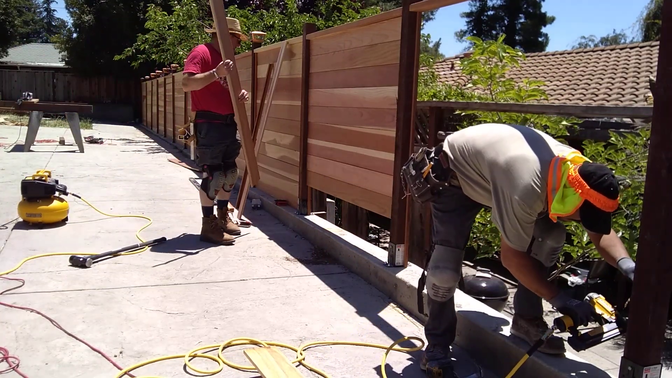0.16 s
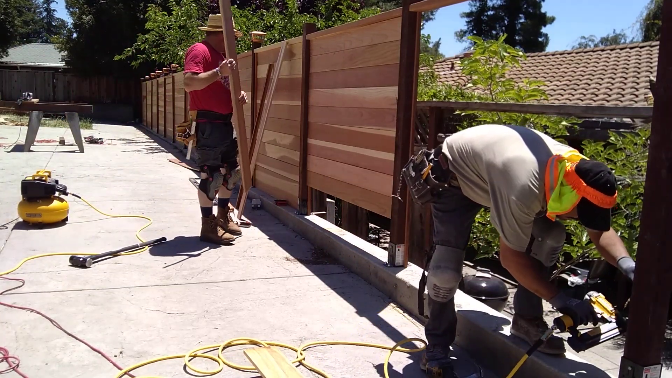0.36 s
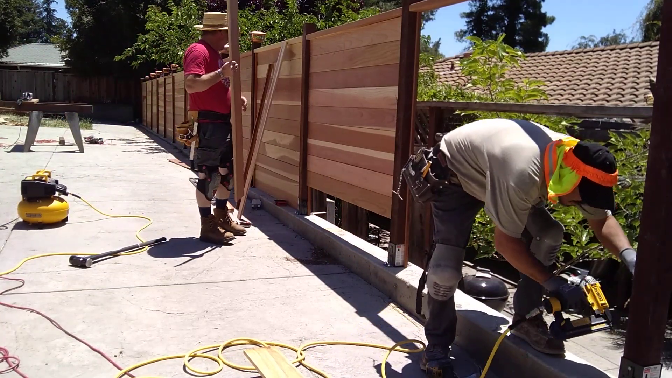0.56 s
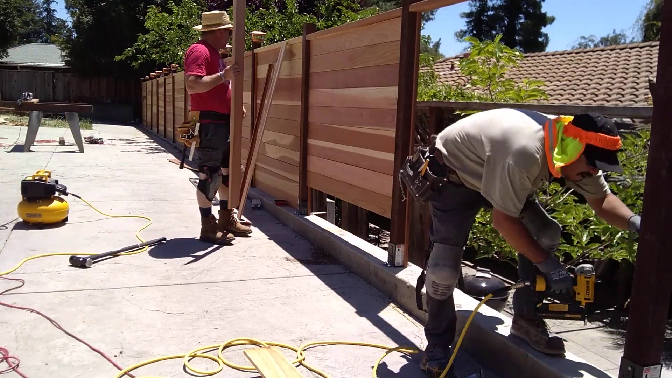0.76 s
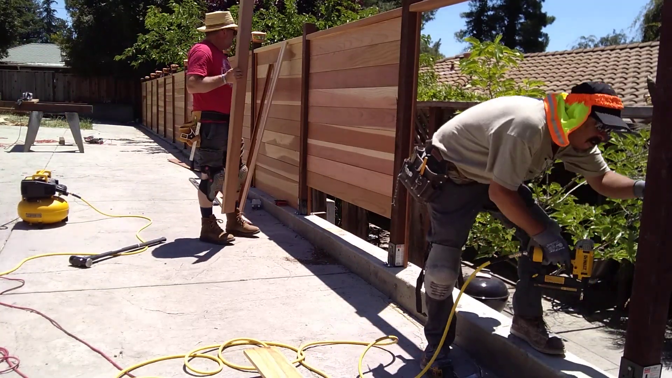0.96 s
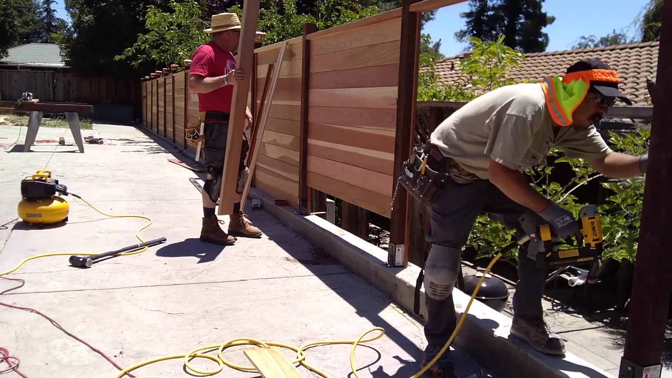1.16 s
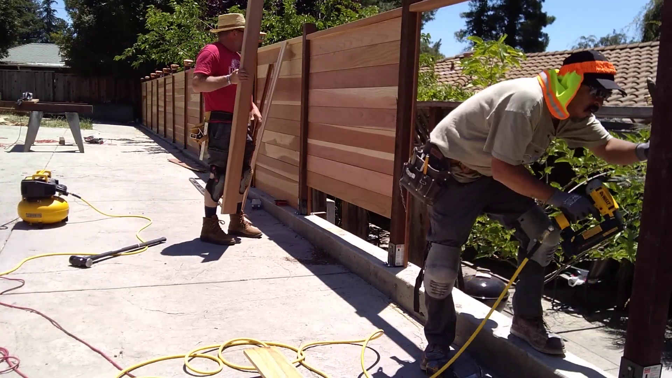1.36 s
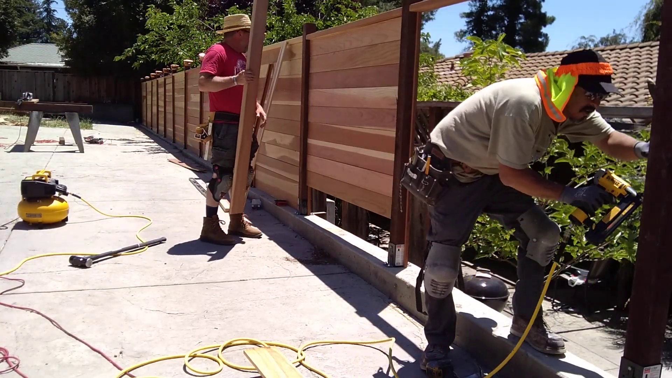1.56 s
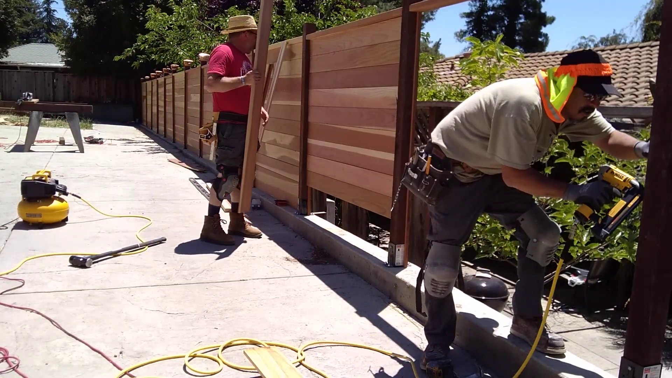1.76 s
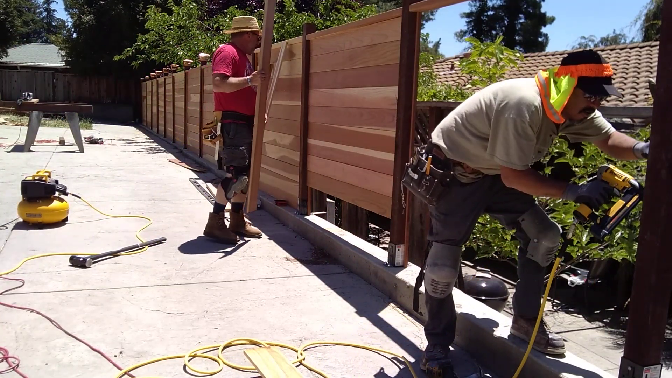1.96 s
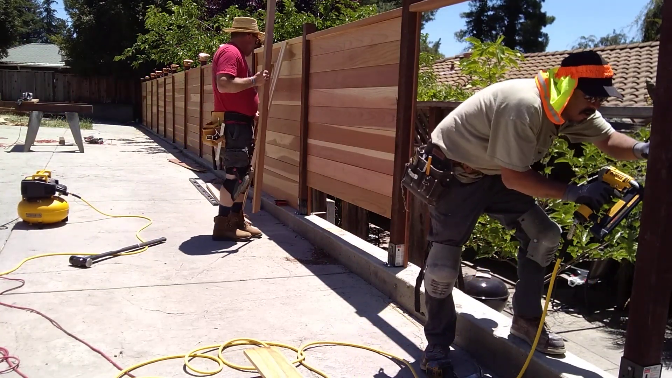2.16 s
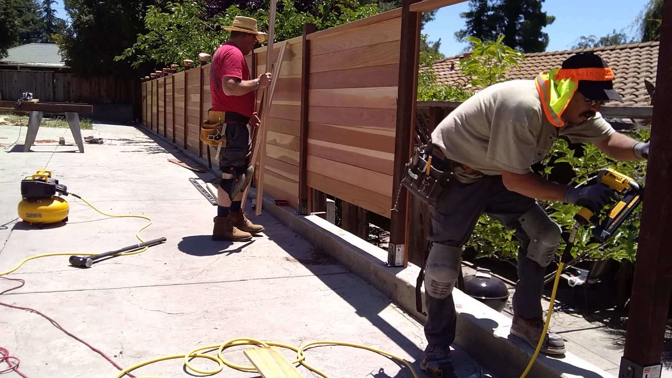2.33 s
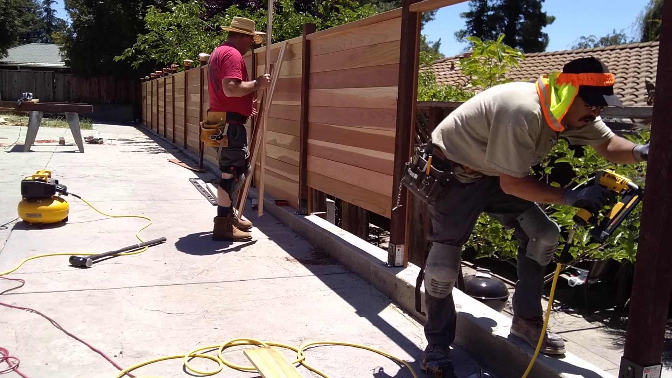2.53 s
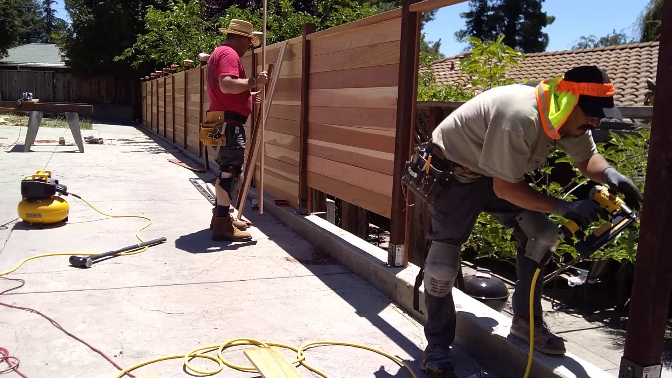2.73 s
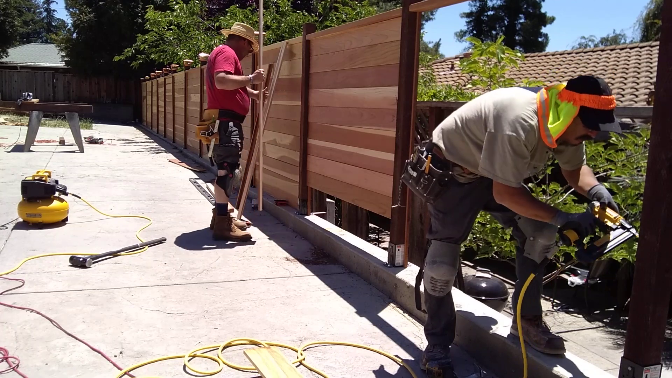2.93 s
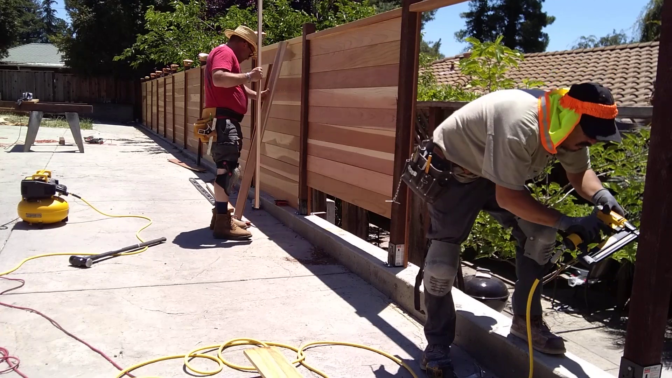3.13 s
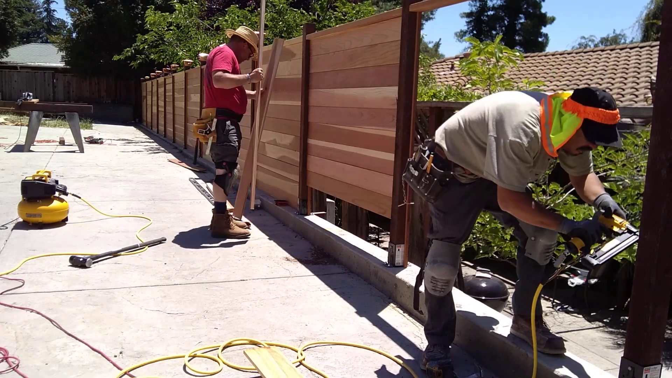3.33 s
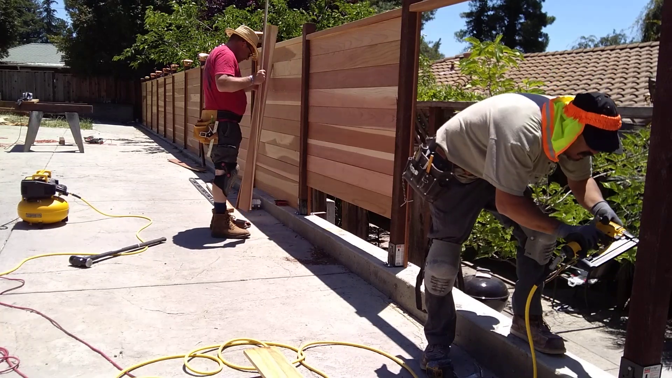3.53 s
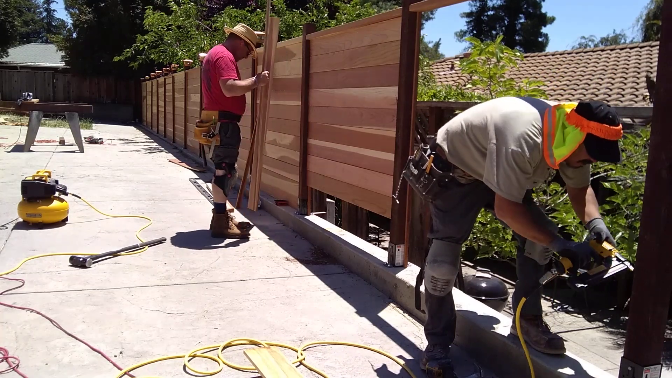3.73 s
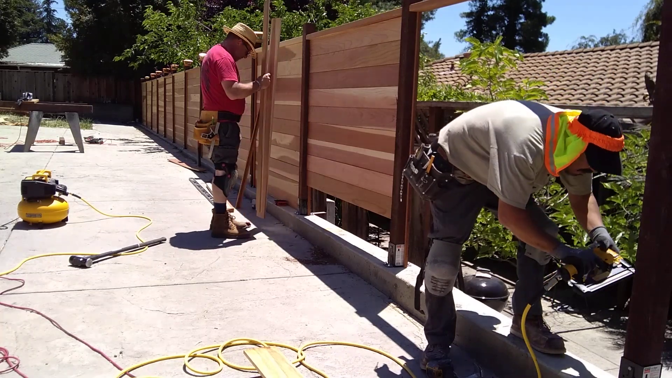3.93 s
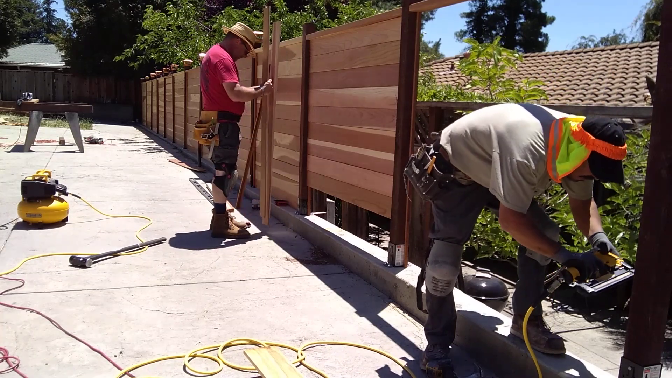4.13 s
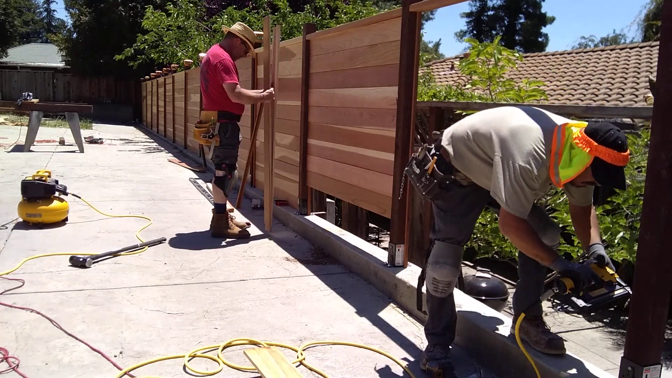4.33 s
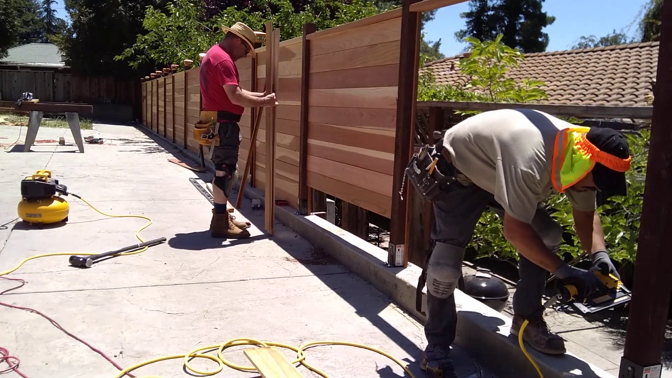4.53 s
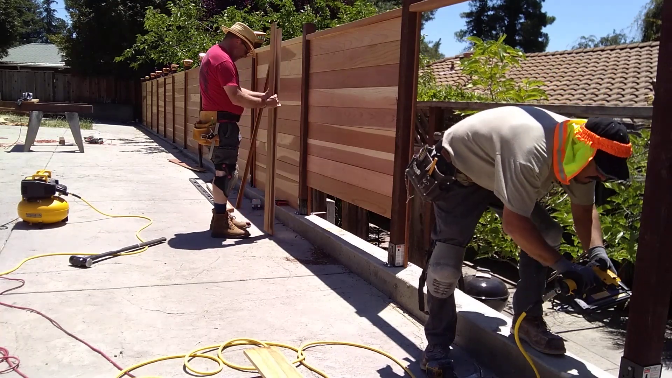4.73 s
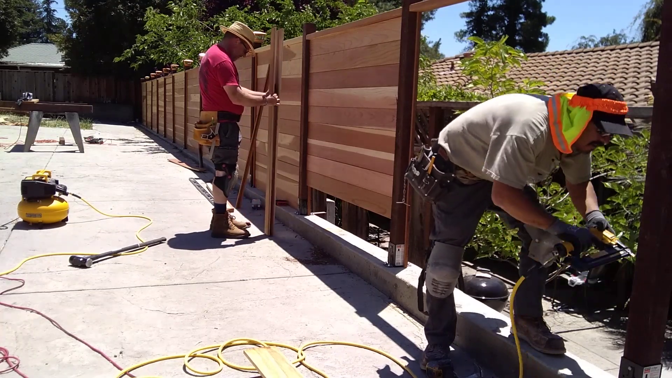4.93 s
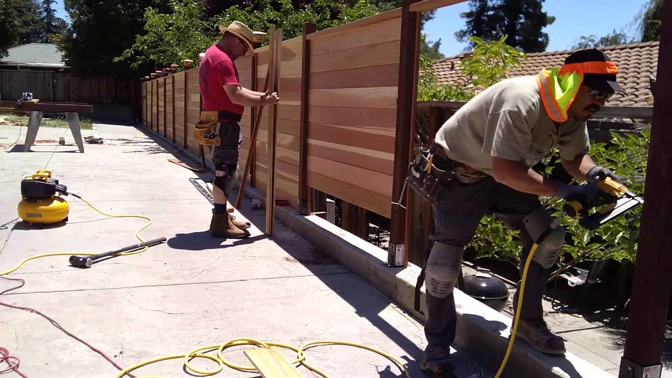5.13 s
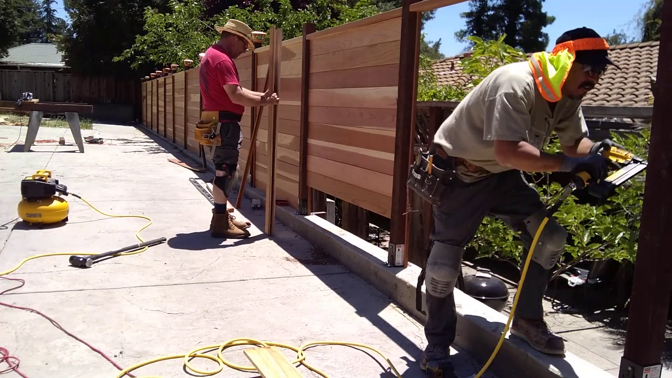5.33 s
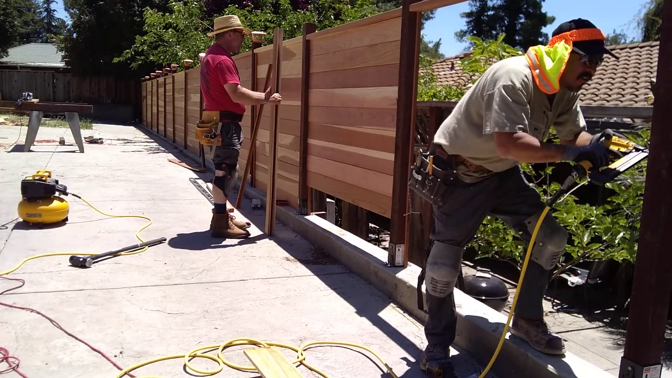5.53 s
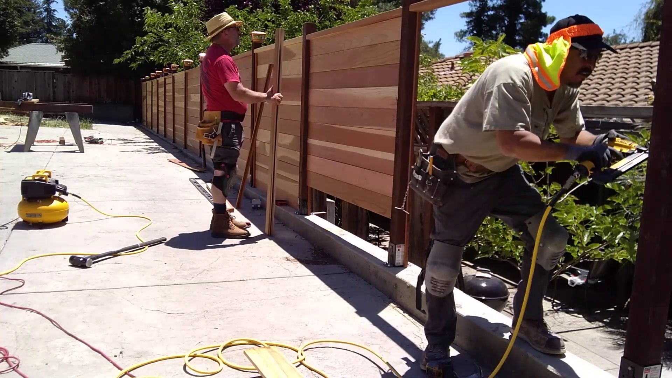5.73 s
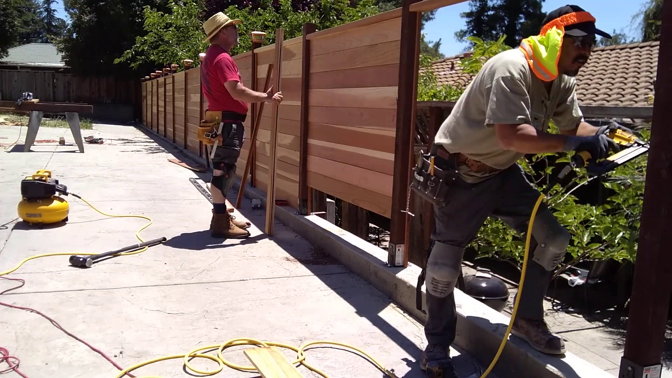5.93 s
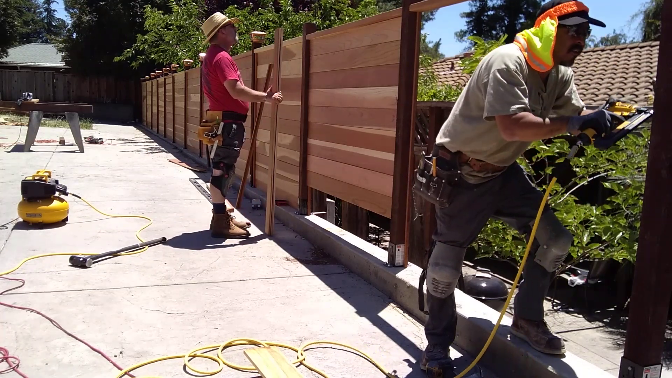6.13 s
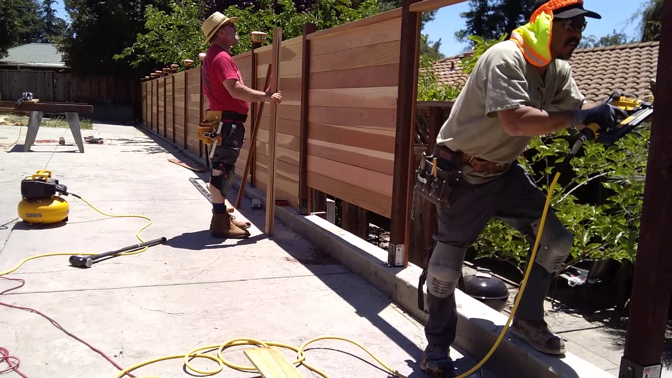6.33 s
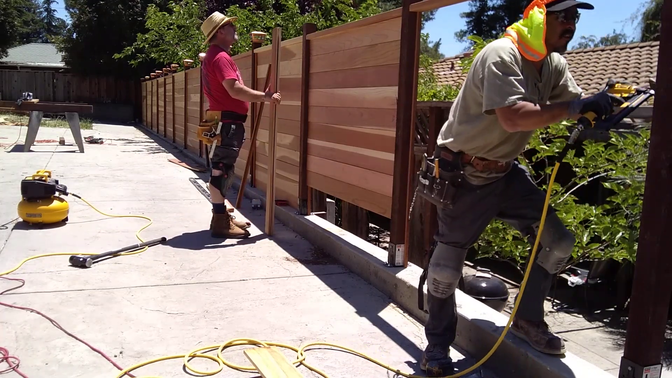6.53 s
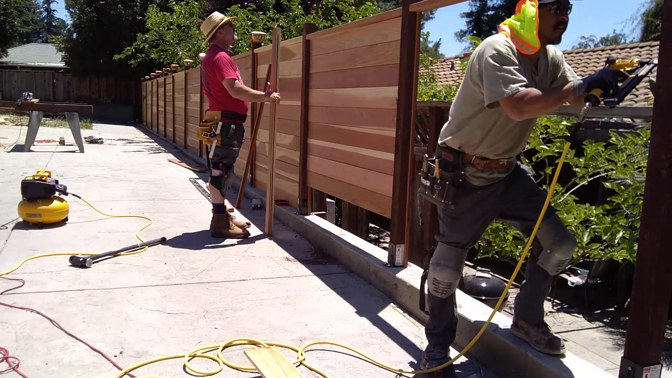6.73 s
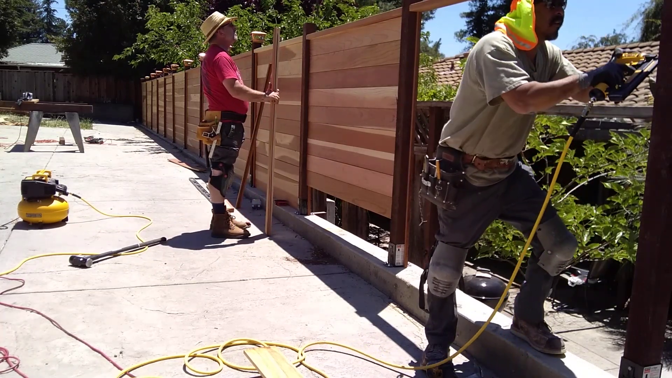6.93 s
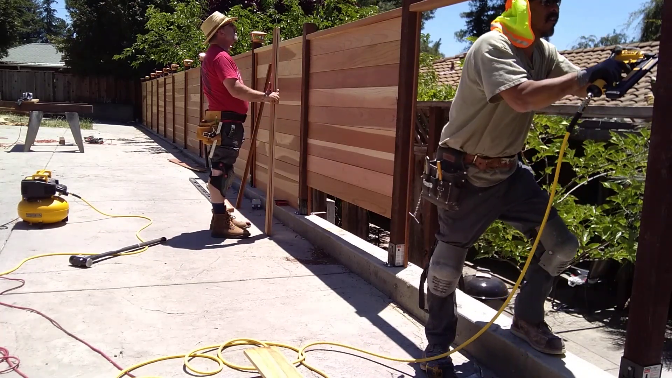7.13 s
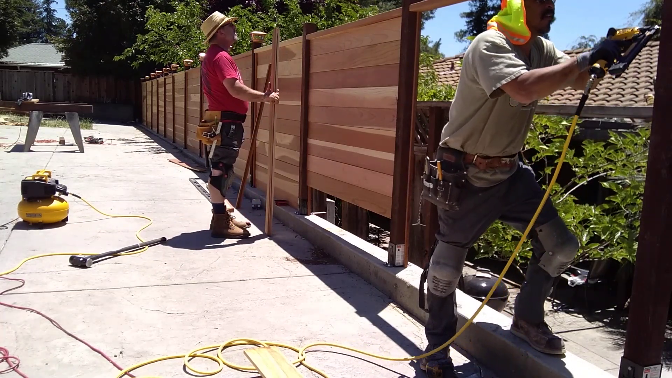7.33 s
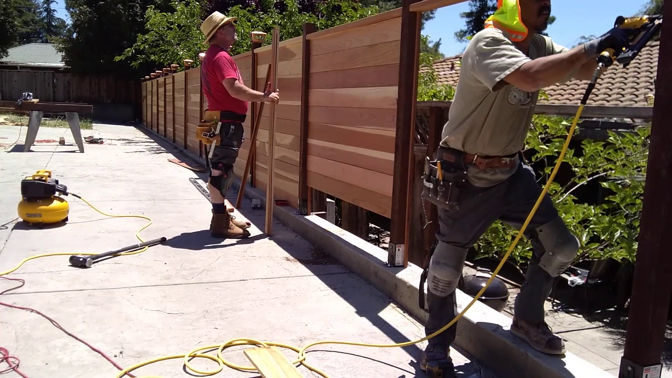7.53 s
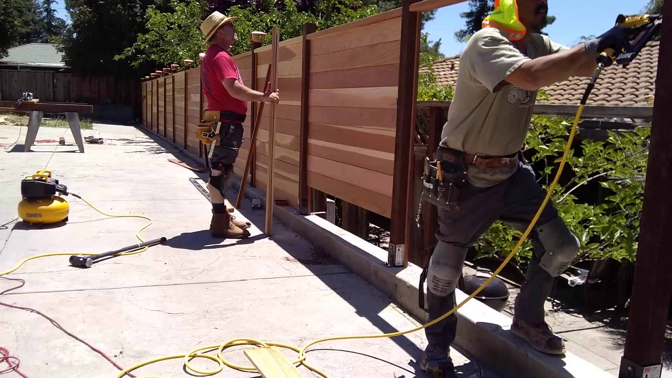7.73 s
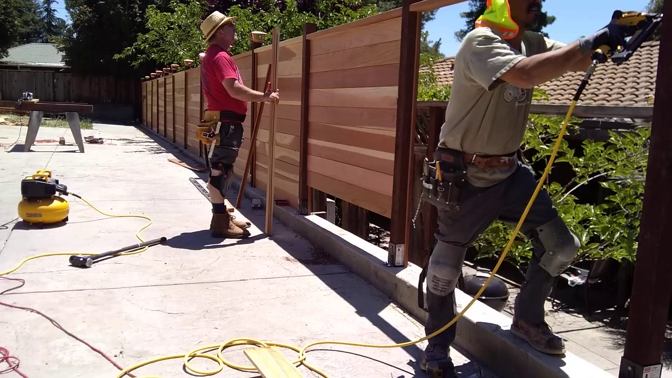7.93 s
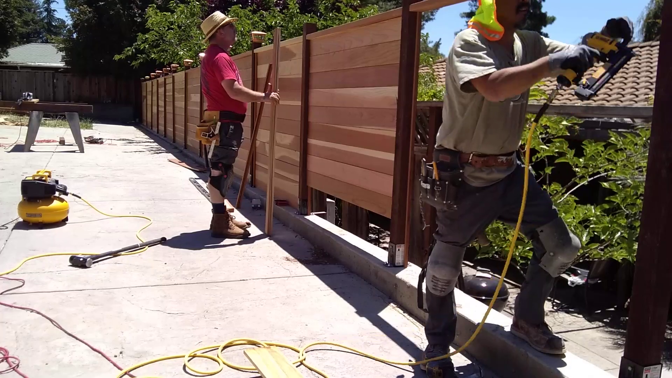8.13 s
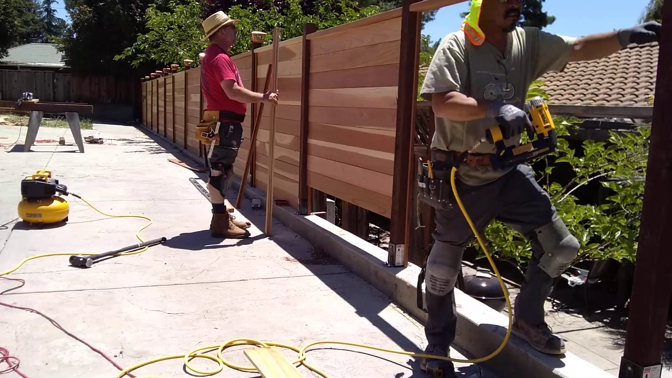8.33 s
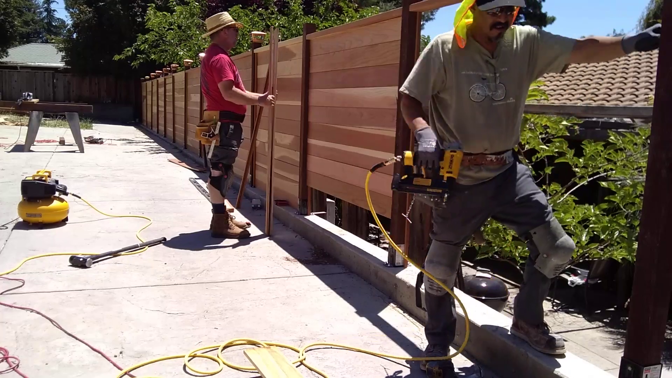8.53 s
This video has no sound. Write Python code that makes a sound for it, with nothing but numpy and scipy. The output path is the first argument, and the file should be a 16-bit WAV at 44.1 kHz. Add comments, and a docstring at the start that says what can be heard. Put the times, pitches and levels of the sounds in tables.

```python
"""Outdoors beside a fence in a breeze: an air nailer drives nine nails close to a camera.
Each shot: the valve hisses open, the piston slams the nail home and rebounds; on release a jet of air
vents and the piston knocks back up. All this is shaped noise, pressure pulses and ringing modes.
Lumpy low noise buffets the left port, sliding sines call as small birds, and a faint tone falls.
The camera widens its stereo and rides its gain, so the yard swells up between shots."""
import sys
import numpy as np
from scipy import signal
from scipy.fft import rfft, irfft, next_fast_len
from scipy.io import wavfile
from scipy.ndimage import uniform_filter1d

SR = 44100
rng = np.random.default_rng(int(sys.argv[2]) if len(sys.argv) > 2 else 0)


def waveform_to_disk(signal):
    """Save audio, clipped to [-1, 1], as 16-bit WAV at the path in sys.argv[1]."""
    frames = np.transpose(np.atleast_2d(signal))
    scaled = np.clip(frames, -1, 1) * 32767
    samples = np.round(scaled).astype(np.int16)
    wavfile.write(sys.argv[1], SR, samples)


N = 378819

# All levels stand ahead of the camera's gain control; spectra are relative, as noise() evens them.
# Nails driven: (time [s], piston travel since the valve opened [ms], blow level [dB],
# second blow re first [dB], crack level [dB])
BLOWS = [(0.323, 18.8, -8.5, -3.5, -9.5), (2.4124, 19, -5, -19.5, -10), (3.428, 20.2, -8, -7.5, -11),
         (4.1147, 19.7, -9.5, -7.5, -12.5), (4.6593, 17.4, -8.5, -7, -9.5), (5.837, 19.6, -6.5, -6, -12),
         (6.3882, 19.1, -10.5, 0.1, -11.5), (7.056, 19.6, -9.5, -1, -11), (7.797, 16.9, -8, -0.2, -10)]
# Colour of air through the valve, also lent to ticks and clanks: (frequency [Hz], density [dB per Hz])
VALVE_AIR = [(200, -1), (400, -1), (800, -18.5), (1500, -9.5), (3000, -11), (5000, -11), (7500, -7),
             (10000, -0.8), (11500, 6), (13000, -10), (14000, -8.5)]


def amp(db):
    """Decibels to amplitude."""
    return 10 ** (np.asarray(db) / 20)


def evened(x):
    """Scales a signal to an RMS of one."""
    return x / np.sqrt(np.mean(x ** 2) + 1e-20)


def read(points, hz):
    """Reads a spectrum table, straight between its points on a log frequency axis."""
    f, value = np.transpose(points)
    return np.interp(np.log(hz + 1), np.log(f + 1), value)


def curve(rows):
    """Draws a table of times and values as a line through the whole scene."""
    return np.interp(np.arange(N) / SR, *np.transpose(rows))


def add(mix, s, sound):
    """Mixes a sound in at s seconds, cut off at the scene's end."""
    part = mix[..., round(s * SR):][..., :sound.shape[-1]]
    part += sound[..., :part.shape[-1]]


def noise(spectrum, alike=None, patchy_db=3.5):
    """Two-port noise of a given colour in drifting patches; the ports share part of it."""
    # Likeness of the ports for the near sounds: (frequency [Hz], correlation [0-1])
    near_alike = [(300, 0.88), (1500, 0.86), (3000, 0.72), (6000, 0.23), (12000, 0.2)]
    # Right port against the left: (frequency [Hz], level [dB])
    right_tilt = [(500, 3), (3000, 4.5), (8000, -1), (12000, -6), (14000, -1)]
    frames, hz = N // 128 + 5, np.fft.rfftfreq(512, 1 / SR)
    a, b, c, d, patches = rng.standard_normal((frames, 257, 5)).T
    patches = uniform_filter1d(patches, size=6, axis=0)
    patches = evened(uniform_filter1d(patches, size=8, axis=1))
    same = np.clip(read(near_alike if alike is None else alike, hz), -1, 1)[:, None]
    left = a + 1j * b
    right = same * left + np.sqrt(1 - same ** 2) * (c + 1j * d)
    right = right * amp(read(right_tilt, hz))[:, None]
    z = np.array([left, right]) * amp(read(spectrum, hz)[:, None] + patchy_db * patches)
    return evened(signal.istft(z, nperseg=512, noverlap=384)[1][:, :N])


def swell(rise, t60):
    """Half a second of envelope: rises softly, then dies away by 60 dB per t60 (both in s)."""
    t = np.arange(SR // 2) / SR
    return (1 - np.exp(-(t / rise) ** 2)) * amp(-60 * t / t60)


def splutter(depth_db, size):
    """Quick random level changes of a turbulent jet, smoothed over size samples twice."""
    drift = uniform_filter1d(rng.standard_normal(N), size=size)
    return amp(depth_db * evened(uniform_filter1d(drift, size=size)))


def ring(modes, damp):
    """One blow on a body; every blow lands elsewhere and weights and shifts the modes anew."""
    t = np.arange(SR // 8)[:, None] / SR
    hz, db, t60 = np.transpose(modes)
    shift, weight = rng.standard_normal((2, len(hz)))
    decay = amp(db + 6.9 * weight - 60 * t / (damp * t60))
    out = (decay * np.sin(2 * np.pi * hz * (1 + .04 * shift) * t)).sum(1)
    return -out / abs(out).max()


def site():
    """Outdoor air: a steady low murmur and rustle with a thin hiss under them."""
    # Colour of the outdoor air: (frequency [Hz], density [dB per Hz])
    air = [(150, 0), (300, -12), (500, -6.5), (900, -18), (1300, -26), (2200, -26), (3300, -28),
           (5000, -30.5), (8000, -35.5), (11000, -30), (13500, -39.5)]
    # Likeness of the ports for sound from all sides: (frequency [Hz], correlation [0-1])
    diffuse = [(300, 0.56), (1500, 0.2), (4000, 0.05), (12000, .05)]
    hiss = noise([(500, -2.0), (3000, -3.0), (5000, -5.5), (8000, -17), (14000, -21.0)], diffuse)
    return amp(-61) * noise(air, diffuse, patchy_db=2.0) + amp(-72.5) * hiss


def wind():
    """Lumpy buffeting, mostly at the left port with a steeper-growing roar, plus eddies of about a cycle."""
    # Wind at the left port: (time [s], level [dB])
    buffet = [(0, -36.5), (.3, -32), (.4, -36), (.7, -43.5), (1.0, -60), (1.1, -44), (1.45, -44.5),
              (2.35, -46.5), (2.5, -55.5), (3.0, -52.5), (3.35, -44.5), (3.7, -65.5), (3.95, -65.5),
              (4.15, -48), (4.7, -39), (5.1, -66.5), (5.4, -38.5), (5.8, -45), (6.2, -53.5), (6.5, -47.5),
              (6.8, -53), (7.1, -44.5), (7.4, -55), (7.8, -36), (8.59, -46)]
    # Colour of the buffeting: (frequency [Hz], density [dB per Hz])
    gust = [(20, -14.5), (40, -1.5), (80, 5.5), (130, 2.75), (200, -8), (280, -12.5), (400, -21.5),
            (600, -35.5), (1000, -47)]
    # Colour of the roar of strong wind: (frequency [Hz], density [dB per Hz])
    flutter = [(60, -30.5), (110, -8.5), (170, 2), (260, -6), (400, -13.5), (700, -27.5), (3000, -70.5)]
    # Strongest single eddies that thump the left port: (time [s], envelope peak [dB], pitch [Hz])
    eddies = [(0.137, -27, 104), (0.252, -19, 180), (.281, -22, 133), (0.634, -25.5, 173.6),
              (1.451, -24.5, 74.4), (1.93, -29.5, 94), (2.361, -29, 89.8), (3.133, -27.5, 130),
              (3.328, -31.5, 107), (4.426, -23, 122), (4.462, -17.5, 169), (5.404, -23.5, 116.6),
              (5.791, -27.5, 113), (6.605, -25.5, 122), (6.879, -27, 115.7), (7.95, -19, 172),
              (8.101, -23, 150), (8.215, -29.5, 328), (8.314, -29.5, 141), (8.469, -28, 110),
              (8.561, -24.5, 121)]
    hz = np.fft.rfftfreq(N, 1 / SR)
    lumps = rfft(rng.standard_normal((2, N))) / (1 + (hz / 24) ** 4)  # slow, below about 24 Hz
    lumps = evened(irfft(lumps, N))
    colour = amp(read([(5.5, -39)] + gust + [(3000, -72.5)], hz))
    lumpy = rng.standard_normal((2, N)) * amp(3.5 * lumps)
    left, right = (evened(irfft(rfft(port) * colour, N)) for port in lumpy)
    wind_db = curve(buffet)
    out = amp(wind_db) * np.array([left, amp(-14) * right])

    roar = rng.standard_normal(N) * amp(2.37 * lumps[0])
    roar = evened(irfft(rfft(roar) * amp(read(flutter, hz)), N))
    out[0] += amp(-47 + 1.5 * (wind_db + 39)) * roar  # gains 1.5 dB per dB of wind

    t = np.arange(-1300, 1300) / SR
    for (s, db, pitch_hz), phase in zip(eddies, rng.random(len(eddies))):
        turns = pitch_hz * t
        eddy = np.exp(-(turns / 0.45) ** 2) * np.sin(2 * np.pi * (turns + phase))
        add(out[0], s + t[0], amp(db) * eddy)
    return out


def birds():
    """Thin, husky notes: sines that slide down onto a held pitch and waver, stronger on the left."""
    # Bird notes: (time [s], level before panning [dB], first pitch [Hz], length [s])
    notes = [(0.647, -69, 5700, 0.035), (1.012, -71, 6900, 0.043), (1.775, -68.5, 6400, 0.036),
             (2.098, -67, 6200, 0.061), (2.148, -68.5, 6300, 0.076), (2.225, -81, 5780, 0.038),
             (3.337, -71.5, 5600, 0.027)]
    held_hz, slide_s, waver_hz = 5430, .011, 60
    out = np.zeros(N)
    for s, db, first_hz, length in notes:
        t = np.arange(0, length, 1 / SR)
        waver = evened(uniform_filter1d(rng.standard_normal(4500), size=90))[:len(t)]
        hz = held_hz + (first_hz - held_hz) * np.exp(-t / slide_s) + waver_hz * waver
        note = signal.windows.tukey(len(t), .7) * np.sin(2 * np.pi * np.cumsum(hz) / SR)
        add(out, s, amp(db) * note)
    return out * amp([[2.5], [-2.5]])


def faint_tone():
    """A soft sine that sags a little in pitch."""
    # Falling tone: (time [s], length [s], level [dB], first pitch [Hz], last pitch [Hz])
    tones = [(2.86, 0.4, -71.5, 662, 622.5)]
    out = np.zeros(N)
    for s, length, db, first_hz, last_hz in tones:
        hz = np.linspace(first_hz, last_hz, round(length * SR))
        tone = signal.windows.tukey(len(hz), .6) * np.sin(2 * np.pi * np.cumsum(hz) / SR)
        add(out, s, amp(db) * tone)
    return out


def taps():
    """The tool's nose: a dry tick over a dull knock in wood; far thuds have no tick and a long tail."""
    # The tool's nose touches wood: (time [s], tick level [dB], knock level [dB])
    touches = [(1.775, -61.5, -50), (2.062, -63, -54.5), (2.126, -66, -54), (2.373, -73.5, -49.5),
               (3.221, -45.5, -51), (3.997, -46.5, -47.5), (4.523, -42, -43), (5.598, -56, -49.5),
               (6.215, -55, -47), (6.847, -50, -45.5), (6.929, -63.5, -61), (7.499, -49.5, -47),
               (7.549, -64.5, -64)]
    # Dull knocks further off, perhaps boards set down: (time [s], level [dB])
    thuds = [(1.028, -53), (1.451, -50.5), (1.866, -48.5), (4.931, -49), (5.382, -45.5), (6.0, -41.5)]
    # Colour of the knocks: (frequency [Hz], density [dB per Hz])
    knock_colour = [(200, -5.5), (500, -0.5), (1000, -9.5), (2000, -19.5), (4000, -22), (9000, -34)]
    ticks, knocks = np.zeros((2, N))
    for s, tick_db, knock_db in touches:
        add(ticks, s, amp(tick_db) * (swell(0.00034, 0.085) + amp(-16.5) * swell(.005, 0.29)))
        add(knocks, s, amp(knock_db) * swell(0.0098, 0.15))
    fade = np.linspace(1, 0, SR // 2)
    for s, db in thuds:
        tail = amp(-1.5) * fade * swell(0.0077, 0.39)
        add(knocks, s, amp(db) * (swell(0.0021, 0.04) + tail))
    return ticks * noise(VALVE_AIR) + knocks * noise(knock_colour)


def vents():
    """The cylinder empties: a bright jet fades into a duller one; the piston starts and stops with a knock."""
    # Trigger let go: (time [s], jet level [dB])
    releases = [(0.4353, -11.5), (2.5158, -14.5), (3.4975, -13.5), (4.1762, -14), (4.7107, -14.5),
                (5.9016, -13.5), (6.4272, -15.5), (7.133, -14), (7.9046, -13)]
    # Colour of the fresh jet: (frequency [Hz], density [dB per Hz])
    jet_colour = [(200, -16), (400, -18), (800, -20.5), (1500, -23.5), (3000, -18), (5000, -14), (7500, -9),
                  (10000, -5.5), (11500, 3), (13000, -4.5), (14000, -10)]
    # Colour of the jet as it dies: (frequency [Hz], density [dB per Hz])
    dying_colour = [(200, -6), (400, -3.5), (800, -20), (1500, -30.5), (3000, -13), (5000, -4.5),
                    (7500, -1), (10000, -7.5), (11500, -12), (13000, -21.5), (14000, -19.5)]
    # Cylinder head modes, varied per knock: (mean frequency [Hz], mean level [dB], t60 at damp 1 [s])
    head = [(530, 2, 0.033), (848, -3, 0.046), (1510, -11.5, 0.034), (2950, -2.5, 0.035),
            (3280, -7.5, 0.014)]
    piston_db, return_s = -26, .038  # knock at the top, this long after the piston leaves the bottom
    jet, dying, knocks = np.zeros((3, N))
    for s, db in releases:
        add(jet, s, amp(db) * swell(0.0034, 0.18))
        add(dying, s, amp(db - 19.5) * swell(0.015, 0.36))
        add(knocks, s, amp(piston_db + 5.0) * ring(head, 0.39))
        add(knocks, s + return_s, amp(piston_db) * ring(head, 1.0))
    return jet * splutter(1.4, size=90) * noise(jet_colour) + dying * noise(dying_colour) + knocks


def valve():
    """A spit of air as the valve opens, then a thinner hiss while the piston travels."""
    level = np.zeros(N)
    for s, travel_ms, *_ in BLOWS:
        spit_and_hiss = swell(.0008, .038) + amp(-8) * swell(0.0025, .3)
        add(level, s - travel_ms * .001, amp(-27) * spit_and_hiss)
    return level * noise(VALVE_AIR)


def blows():
    """Suction pulses as the nail bites and the piston bottoms out, a weaker third, a crack and a rebound."""
    # Colour of the crack: (frequency [Hz], density [dB per Hz])
    crack_colour = [(300, -15.5), (800, -6), (1500, -9.5), (3000, -4), (5000, -8), (7500, -3.5),
                    (10000, -6), (11500, 3.5), (13000, -5.5), (14000, -10.5)]
    # Board modes, varied per blow: (mean frequency [Hz], mean level [dB], t60 at damp 1 [s])
    board = [(350, 8, 0.053), (840, 5, 0.025), (1340, -17.5, 0.063), (1993, 13, 0.13), (2877, 4, 0.27),
             (3730, -12, 0.072), (3700, -11, 0.025)]
    third_db, rebound_s, rebound_db = -13.5, 0.035, -37  # third blow is re the first
    level, clank, thumps = np.zeros((3, N))
    u = np.arange(-88, 160) / (SR * .00017)  # time in units of 0.17 ms
    pulse = 0.72 * np.exp(-((u - 1.5) / 6.27) ** 2 / 2) - np.exp(-u ** 2 / 2)
    pulse -= pulse.mean() * 2 * np.hanning(len(u))  # open air holds no steady pressure
    for s, _, db, second_db, crack_db in BLOWS:
        for late, step_db in ((0, 0.0034), (.0032, second_db), (.0064, third_db)):
            add(thumps, s + late - 88 / SR, amp(db + step_db) * pulse)
            add(thumps, s + late, amp(db + step_db - 12.5) * ring(board, 0.34))
        add(level, s, amp(crack_db) * swell(.0016, .03))
        add(level, s, amp(crack_db - 20.5) * swell(0.0028, 0.2))
        add(clank, s + 0.0022, amp(crack_db + 2) * swell(0.0012, 0.0022))  # steel meets the bumper
        add(level, s + rebound_s, amp(rebound_db) * swell(.0012, 0.059))
        add(thumps, s + rebound_s, amp(rebound_db + 2.5) * ring(board, 0.41))
    crack = level * splutter(0.57, size=25) * noise(crack_colour)
    return thumps + crack + clank * noise(VALVE_AIR)


def yard(x):
    """Random echoes off fence, slab and roofs; above the middle range, the higher the sooner they die."""
    # Decay of the yard: (frequency [Hz], t60 [s])
    decay = [(300, .26), (2000, .5), (7000, .3), (12000, .13)]
    echoes = np.zeros((2, SR // 2))
    at = np.arange(300, SR // 2 - 20, 20) + rng.integers(0, 20, (2, (SR // 2 - 301) // 20))
    np.put_along_axis(echoes, at, rng.choice([-1., 1.], at.shape), 1)
    hz, t, z = signal.stft(echoes, SR, nperseg=256)
    tail = signal.istft(z * amp(-60 * t / read(decay, hz)[:, None]), SR, nperseg=256)[1]
    return signal.fftconvolve(x, tail / np.linalg.norm(tail[0]), axes=1)[:, :N]


def scene():
    """The tool on the right reaches the left port late; birds, tone, echoes, wind and air join it."""
    port_lag = 3.6  # samples
    tool = valve() + blows() + vents() + taps()
    late = np.sinc(np.arange(-32, 33) - np.array([[port_lag], [0]])) * np.hanning(65)
    near = signal.oaconvolve(tool, late, "same", axes=1) + birds() + faint_tone()
    return near + amp(-19.5) * yard(near) + wind() + site()


def gain_control(x):
    """Full gain in the quiet; loud sound above 1 kHz pulls it down fast, and it climbs back slowly."""
    threshold_db, range_db, attack_s, hold_s, climb_db_per_s = -37, 11.5, 0.011, .33, 8.5
    heard = signal.sosfilt(signal.butter(2, 1000, "high", fs=SR, output="sos"), x)
    power = signal.lfilter(np.ones(88) / 88, 1, (heard ** 2).mean(0))  # 2 ms mean
    over_db = np.clip(10 * np.log10(power + 1e-12) - threshold_db, 0, range_db)
    # The excess over the range delays the climb: by hold_s after a full cut, not at all after a small one
    over_db = over_db * (1 + hold_s * climb_db_per_s / range_db)
    climb = np.arange(N) * climb_db_per_s / SR
    over_db = np.clip(np.maximum.accumulate(over_db + climb) - climb, 0, range_db)
    keep = np.exp(-1 / (attack_s * SR))
    return amp(range_db - signal.lfilter([1 - keep], [1, -keep], over_db))


def record(dry):
    """Each channel loses a late share of the other, widening and combing; hiss, roll-off and gain follow."""
    # Share of the other channel taken away: (frequency [Hz], share [0-1])
    cross_share = [(100, .82), (2200, .92), (4500, .88), (7000, .7), (13000, .6)]
    # Microphone roll-off: (frequency [Hz], level [dB])
    roll_off = [(13900, 0), (14300, -5), (14650, -32), (15700, -46)]
    cross_lag, edge_hz = 19.7, 15700  # lag in samples; upper edge of the band
    size = next_fast_len(N + 64)
    hz, z = np.fft.rfftfreq(size, 1 / SR), rfft(dry, size)
    cross = np.clip(read(cross_share, hz), 0, .95) * np.exp(-2j * np.pi * hz * cross_lag / SR)
    hiss_colour = [(2500, -28.5), (5000, -2.5), (7000, -1.0), (11000, -2.5), (14000, -5)]
    hiss = amp(-71.5) * noise(hiss_colour, [(100, 0.0033), (14000, 0.00059)])
    wide = z - cross * z[::-1] + rfft(hiss, size)
    wide = irfft(wide * amp(read(roll_off, hz)), size)[:, :N]
    wide = np.clip(wide * gain_control(dry), -1, 1)
    low_pass = signal.firwin(511, edge_hz, window=("kaiser", 9), fs=SR)
    return signal.oaconvolve(wide, low_pass[None], "same")


dry = scene()
out = record(dry)
waveform_to_disk(out)
```